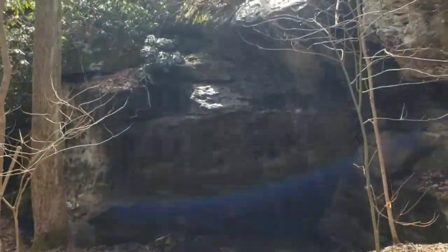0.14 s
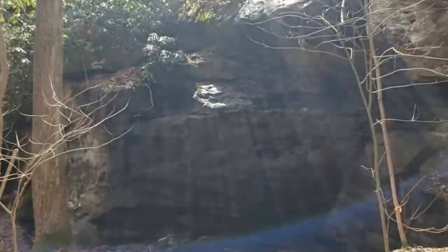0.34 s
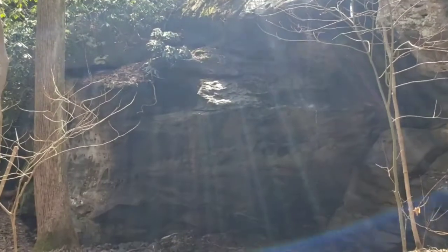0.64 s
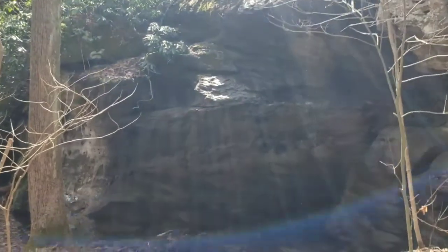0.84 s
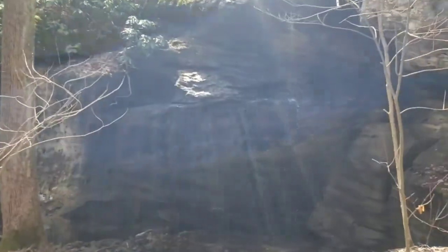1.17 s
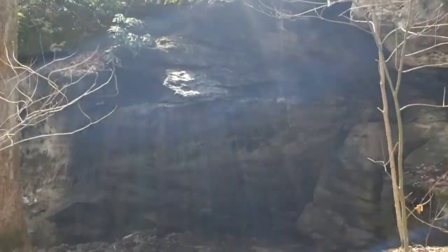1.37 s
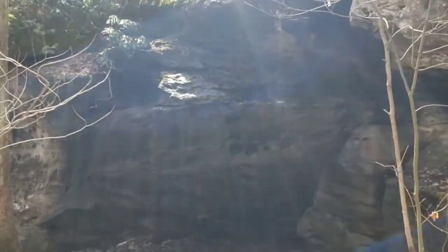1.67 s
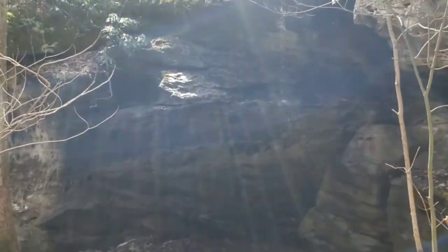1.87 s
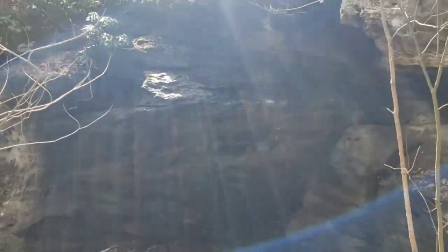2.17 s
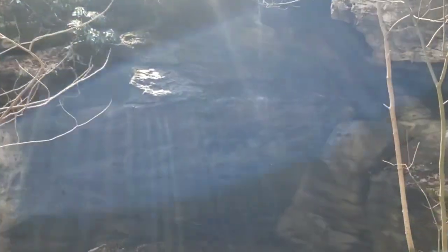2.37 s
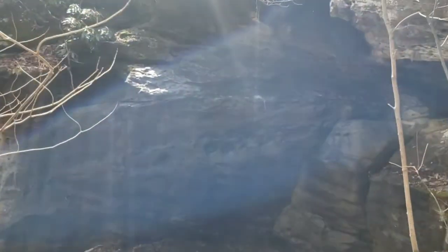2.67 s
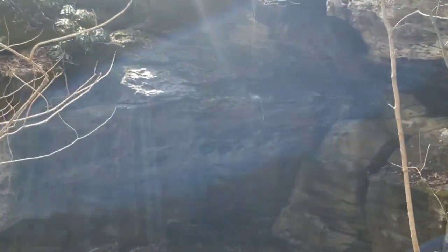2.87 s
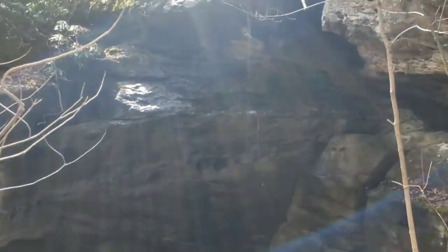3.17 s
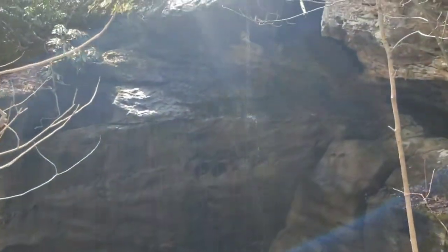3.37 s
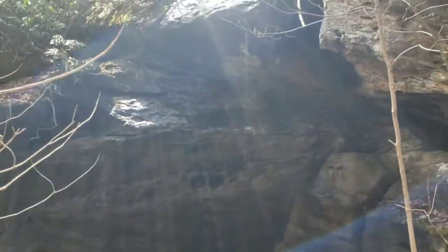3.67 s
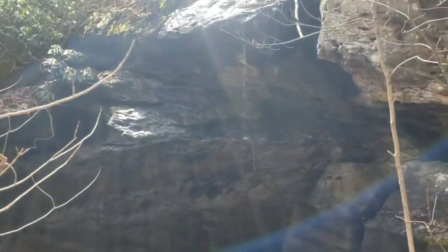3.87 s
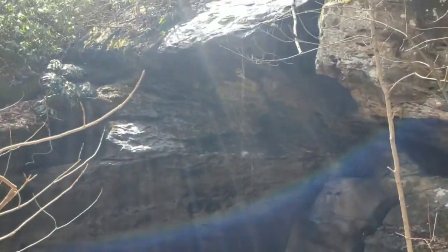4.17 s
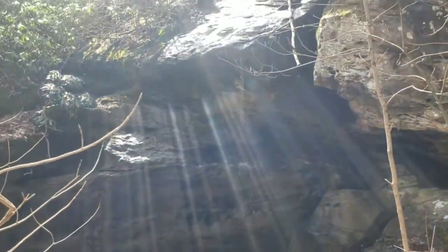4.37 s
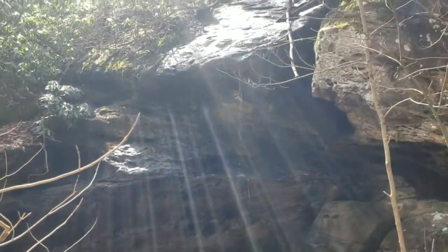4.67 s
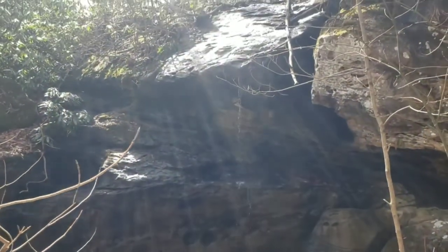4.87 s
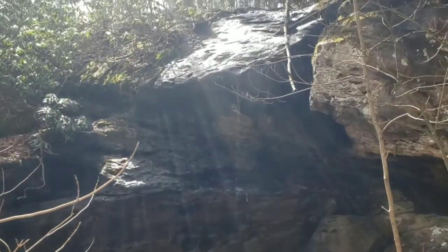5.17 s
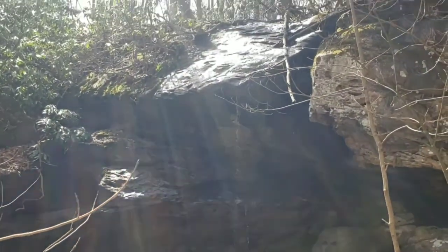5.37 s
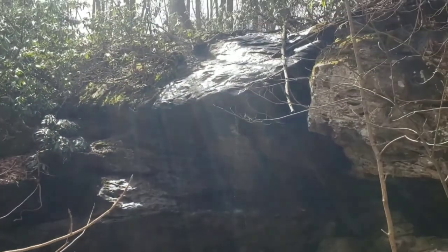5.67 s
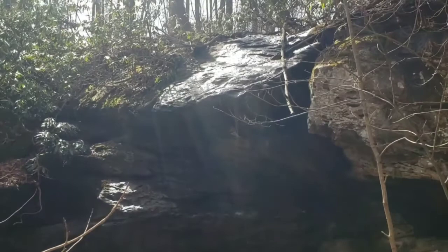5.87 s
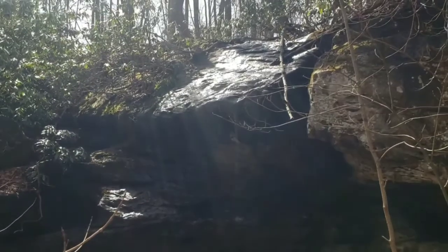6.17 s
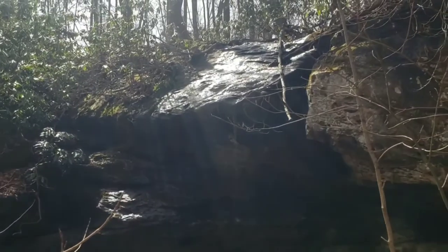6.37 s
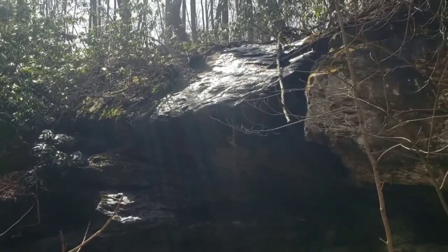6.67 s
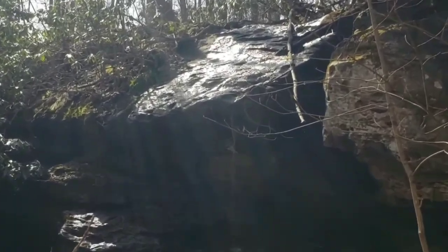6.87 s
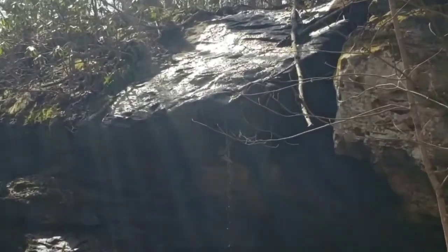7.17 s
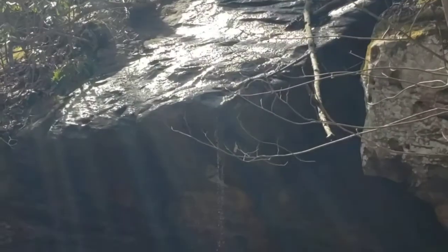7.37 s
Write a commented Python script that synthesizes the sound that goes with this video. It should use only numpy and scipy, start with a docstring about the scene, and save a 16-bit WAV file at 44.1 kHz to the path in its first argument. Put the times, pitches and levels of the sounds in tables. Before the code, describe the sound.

Water trickles and patters off a rock ledge onto stone, with sharp drop smacks and fizzy snaps, while a hand softly bumps the camera.

```python
"""In a quiet wood, water trickles off a rock ledge and spatters on the stone below.
The patter is a crowd of short rings and noise that swells in spurts; bigger drops smack out of it as
bursts of noise through resonances, and close droplets snap as short, high fizzes. The hand that holds the
camera adds rumble and rustle (shaped noise), ticks of the shell (short decaying tones, as are two dull plops)
and one finger rub (jerky noise through shell resonances), mostly nearer the left microphone."""
import sys
import numpy as np
from scipy import signal
from scipy.fft import rfft, irfft, next_fast_len
from scipy.io import wavfile
from scipy.ndimage import uniform_filter1d

SR = 44100
rng = np.random.default_rng(int(sys.argv[2]) if len(sys.argv) > 2 else 0)


def wav_out(sig):
    """Save sig, one row per channel (or a flat mono array), as 16-bit PCM at SR to the path in sys.argv[1]."""
    wavfile.write(sys.argv[1], SR, np.round(np.clip(np.atleast_2d(sig).T, -1, 1) * 32767).astype(np.int16))


N = 332073  # length of the sound in samples
LEAD_S = .00005  # the ledge lies a little to the right: its sound reaches that microphone first


def amp(db):
    """Turns dB into a plain gain."""
    return 10 ** (np.asarray(db) / 20)


def evened(x):
    """Scales a sound to an overall loudness (RMS) of 1."""
    return x / np.sqrt(np.mean(x ** 2) + 1e-20)


def smoothed_twice(x, width, axis=-1):
    """Averages neighbours twice, which leaves only slow, rounded changes."""
    return uniform_filter1d(uniform_filter1d(x, width, axis=axis), width, axis=axis)


def steadied(x, length_s):
    """Holds the loudness of a noise even over the given time."""
    power = uniform_filter1d(x ** 2, max(int(length_s * SR), 2), axis=-1)
    return x / np.sqrt(abs(power) + 1e-20)


def read(points, hz):
    """Reads a table of (Hz, value) between its points, on a logarithmic pitch scale."""
    f, value = np.transpose(points)
    return np.interp(np.log(hz + 1), np.log(f + 1), value)


def curves(rows):
    """Turns every column after the time into a curve with one value a sample."""
    s, *columns = np.transpose(rows)
    return [np.interp(np.arange(N) / SR, s, column) for column in columns]


def bump(middle_s, length_s):
    """A smooth rise and fall from 0 to 1 and back."""
    position = (np.arange(N) / SR - middle_s) / length_s
    return np.cos(np.pi * np.clip(position, -.5, .5)) ** 2


def sides(pan_db):
    """Left and right gains whose mean is 1; plus dB makes the left louder."""
    left = amp(pan_db)
    return 2 * np.array([left, np.ones_like(left)]) / (1 + left)


def add(mix, s, sound):
    """Mixes in a sound at the given second, cut off at the end of the mix."""
    part = mix[:, round(s * SR):][:, :sound.shape[1]]
    part += sound[:, :part.shape[1]]


def ring(x, hz, width_hz):
    """One resonance with gain 1 at its peak, which lies no higher than 14700 Hz."""
    return signal.lfilter(*signal.iirpeak(min(hz, SR / 3), hz / width_hz, SR), x)


def spurts(depth_db, length_s):
    """The sound comes in clumps: a gain that wanders up and down at random."""
    width = max(int(length_s * SR), 2)
    return amp(depth_db * evened(smoothed_twice(rng.standard_normal(N), width)))


def spatter(low_hz, high_hz, per_s, spread_db, cycles, wash_db):
    """Droplets as short rings of many pitches, a few much larger than most, over the blur of the far ones."""
    size = amp(spread_db * np.minimum(rng.exponential(1, (2, N)), 4.2))
    lands = rng.random((2, N)) < per_s / SR
    clicks = size * rng.standard_normal((2, N)) * lands
    pitches = np.geomspace(low_hz, high_hz, num=8)
    which = rng.integers(0, len(pitches), (2, N))
    rings = sum(ring(clicks * (which == k), hz, hz / cycles) for k, hz in enumerate(pitches))
    blur = ring(rng.standard_normal((2, N)), np.sqrt(low_hz * high_hz), high_hz)
    return evened(rings) + amp(wash_db) * evened(blur)


# How the water leans at each pitch. Each row: pitch in Hz, left over right in dB.
WATER_LEAN = [(60, 6), (110, 9.5), (200, 17), (380, 30), (700, 8), (1290, 3.5), (2380, -2), (4400, 0.5),
              (8120, 2), (15000, -2.5)]
# How alike the water is at the two microphones. Each row: pitch in Hz, likeness from 0 (none) to 1 (same).
WATER_LIKENESS = [(150, .55), (600, 0.43), (1400, 0.54), (2200, 0.25), (3500, 0.59), (6000, 0.24),
                  (10000, 0), (15000, 0.035)]


def coloured(x, spectrum, patchy_db):
    """Colours a pair of signals in short frames, with drifting patches and the likeness of the two microphones."""
    hz, _, frames = signal.stft(x, SR, nperseg=512, noverlap=384)
    patches = rng.standard_normal(frames.shape[1:])
    for size, axis in ((8, 0), (10, 1)):  # smooth over pitch, then over time
        patches = uniform_filter1d(patches, size=size, axis=axis)
    patches = evened(patches)
    same = np.clip(read(WATER_LIKENESS, hz), -1, 1)[:, None]
    earlier = np.exp(2j * np.pi * hz[:, None] * LEAD_S)
    left = frames[0]
    right = same * left * earlier + np.sqrt(1 - same ** 2) * frames[1]
    gain = amp(read(spectrum, hz)[:, None] + patchy_db * patches)
    frames = np.array([left, right]) * gain * sides(read(WATER_LEAN, hz))[:, :, None]
    return evened(signal.istft(frames, SR, nperseg=512, noverlap=384)[1][:, :N])


# Flow of the trickle, before gushes and clumps.
# Each row: time in seconds, level of the patter in dB, level of the fine spray in dB.
FLOW = [(0.0, -44.5, -43), (0.33, -45, -42), (0.67, -45, -39.5), (1.51, -42, -40), (2.01, -44, -39),
        (2.27, -42, -38.5), (2.52, -44.5, -39), (3.02, -45, -41.5), (3.14, -42, -39), (3.92, -46, -39),
        (4.61, -47, -41), (5.01, -43, -37), (5.56, -46.5, -38.5), (5.83, -42.5, -39.5), (7.32, -42, -38.5),
        (7.53, -43, -39)]
# Colour of the patter. Each row: pitch in Hz, gain in dB compared with the other rows.
PATTER_COLOUR = [(88, -54), (150, -49.5), (303, -26), (391, -19), (515, -10), (561, -29), (725, -10.5),
                 (1210, -8), (2030, -0.5), (2710, -2), (3690, 1), (5970, -7.5), (9000, -25), (11700, -23),
                 (19800, -120)]
# Colour of the fine spray. Each row: pitch in Hz, gain in dB compared with the other rows.
SPRAY_COLOUR = [(4120, -11), (7000, -4), (8530, -6.5), (11400, 1), (15200, 3), (16300, -3.5), (16500, -47)]
# The camera turns. Each row: time in seconds, left over right of the water in dB.
HEADING = [(0, -2), (1.3, -1), (1.6, 1), (2.3, 1), (3.1, 0.5), (4, -0.2), (5.6, 0.5), (6.2, -2), (6.7, -2),
           (7.53, -2.5)]
# Gushes over the ledge.
# Each row: middle in seconds, length in seconds, swell in dB, left over right in dB added to the heading.
GUSHES = [(0.57, 0.18, 3, -1), (0.767, 0.21, 7.5, 2), (1.164, 0.079, 5, -1.5), (1.527, 0.2, 6.5, 2),
          (1.767, 0.083, 2, -7), (2.163, 0.22, 9, 5.5), (2.394, 0.18, 3, 2), (2.748, .14, 6.5, 0),
          (3.016, 0.2, 7, 2.5), (3.249, 0.086, 4, -1), (3.526, 0.16, 2, 2), (4.558, 0.25, 4.5, 0.5),
          (4.798, 0.21, 2.5, -1.5), (5.326, 0.063, 3, -2), (5.534, 0.13, 3.5, 0), (5.81, 0.27, 5.5, 0.5),
          (6.62, 0.07, 2, -2), (6.703, 0.04, 3, -5), (6.834, 0.18, 4, -2), (7.314, 0.14, 2, 2)]


def trickle():
    """Coarse patter and fine spray, clumped by shared spurts and by their own; gushes swell both."""
    patter_db, spray_db = curves(FLOW)
    pan_db, = curves(HEADING)
    swell_db = np.zeros(N)
    for s, length, gush_db, gush_pan_db in GUSHES:
        shape = bump(s, length)
        swell_db += gush_db * shape
        pan_db = pan_db + gush_pan_db * shape
    clumps = evened(spurts(depth_db=0.18, length_s=0.028) * spurts(depth_db=0.94, length_s=0.014))

    coarse = spatter(low_hz=700, high_hz=7550, per_s=1800, spread_db=2.5, cycles=3.06, wash_db=2)
    patter = coloured(coarse, PATTER_COLOUR, patchy_db=2.5) * spurts(depth_db=1.1, length_s=0.032)
    patter = patter * amp(patter_db + swell_db)

    fine = spatter(low_hz=5800, high_hz=14300, per_s=5000, spread_db=2.0, cycles=5.5, wash_db=-1.5)
    spray = coloured(fine, SPRAY_COLOUR, patchy_db=1.66) * spurts(depth_db=0.85, length_s=0.0082)
    spray = spray * amp(spray_db + 0.77 * swell_db)  # the spray swells by a smaller share
    return clumps * sides(pan_db) * (patter + spray)


def shaken(spectrum, same, length_s):
    """A pair of noises of one colour, partly alike, their loudness held even."""
    size = next_fast_len(N)
    gain = amp(read(spectrum, np.fft.rfftfreq(size, 1 / SR)))
    a, b = irfft(rfft(rng.standard_normal((2, size))) * gain, size)[:, :N]
    return steadied(np.array([a, same * a + np.sqrt(1 - same ** 2) * b]), length_s)


# Steady grip on the camera, before lumps and placing left or right.
# Each row: time in seconds, rumble in dB, rustle of skin in dB, deep sway in dB.
GRIP = [(0, -54.5, -54, -82), (.6, -55.5, -58, -70), (1.2, -58, -62.5, -68), (2, -59, -64.5, -80),
        (2.6, -67, -67.5, -54), (3.2, -61.5, -60, -61), (3.8, -66, -64.5, -67), (4.4, -67, -70, -72),
        (4.9, -64, -57.5, -60), (5.5, -71.5, -73.5, -72), (6.1, -67, -69, -68), (6.45, -63, -71, -68),
        (7, -64, -69, -75), (7.53, -66.5, -66, -69)]
# Swells of low sound: shifts of the hand, and near 0.75 s the low body of a gush.
# Each row: middle in seconds, length in seconds, rumble in dB, rustle in dB, sway in dB, left over right in dB.
LOW_SWELLS = [(0.07, 0.086, -45.5, -61, -62, 1), (0.726, 0.08, -60, -47.5, -62, 2),
              (0.773, 0.081, -58, -47, -53, -5), (0.96, 0.24, -59, -54.5, -65, -10),
              (1.44, 0.14, -69, -55, -55, 8), (1.61, 0.33, -47, -49.5, -60, 4),
              (1.806, 0.11, -55, -56.5, -55, 36), (2.157, 0.18, -47.5, -49, -50, 24),
              (2.357, 0.42, -44.5, -57, -43, 18), (2.475, 0.18, -60, -60, -45, 28),
              (2.632, 0.36, -59, -74, -48, 27), (2.768, 0.077, -63, -58.5, -40, 28),
              (2.904, 0.16, -53, -76, -54, 24), (3.008, 0.14, -53, -52, -61, -4),
              (3.275, .1, -60, -72, -49, 25), (3.495, 0.24, -53, -58.5, -68, 15),
              (4.49, .1, -73, -85, -72, 9), (4.913, .15, -56, -59, -66, 19),
              (5.092, 0.14, -57, -79, -62, 26), (5.634, 0.15, -67, -54, -66, 16),
              (5.827, 0.18, -51.5, -65, -52, 18), (6.314, 0.15, -52, -48.5, -58, 1),
              (6.704, .09, -58, -80, -75, 1)]
# Colour of the rumble. Each row: pitch in Hz, gain in dB compared with the other rows.
RUMBLE_COLOUR = [(35, -13), (55, -3), (75, 3.5), (105, -9), (160, -13.5), (300, -34)]
# Colour of the rustle. Each row: pitch in Hz, gain in dB compared with the other rows.
RUSTLE_COLOUR = [(90, -16), (170, -4), (450, -2), (900, -2.5), (1300, -4), (2000, -21)]
# Colour of the deep sway. Each row: pitch in Hz, gain in dB compared with the other rows.
SWAY_COLOUR = [(15, -45), (35, 6), (55, 9), (80, -21), (150, -59)]


def grip():
    """Skin and muscle shake the camera body: sway, lumpy bass and dull rustle; each low swell adds its power."""
    steady_sides = sides(10)[:, None]
    power = [(amp(db) * steady_sides) ** 2 for db in curves(GRIP)]
    for s, length, *levels_db, pan_db in LOW_SWELLS:
        shape = (bump(s, length) * sides(pan_db)[:, None]) ** 2
        power = [p + amp(db) ** 2 * shape for p, db in zip(power, levels_db)]
    rumble_level, rustle_level, sway_level = np.sqrt(power)

    rumble = shaken(RUMBLE_COLOUR, same=0.69, length_s=0.25) * spurts(depth_db=-0.5, length_s=0.074)
    sway = shaken(SWAY_COLOUR, same=0.18, length_s=0.051) * spurts(depth_db=1.5, length_s=0.06)
    rustle = shaken(RUSTLE_COLOUR, same=0.76, length_s=0.2) * spurts(depth_db=4.0, length_s=0.02)
    # The rustle keeps one fixed place: its two side levels are averaged first.
    placed_rustle = sides(5.6)[:, None] * rustle_level.mean(axis=0) * rustle
    return rumble_level * rumble + sway_level * sway + placed_rustle


def heading(s):
    """Left and right gains of a drop at a given time: it lands a little to the right of the patter."""
    return sides(np.interp(s, *np.transpose(HEADING)) - 1.3)[:, None]


# Big drops. Each row: time in seconds, peak of the smack in dB before placing left or right,
# pitch of the smack in Hz, spray in dB against the smack before both are scaled,
# time to fade by 60 dB in seconds.
DROPS = [(0.054, -27.5, 2270, -15, 0.018), (.101, -30, 2070, 3.5, 0.048), (0.146, -29, 1760, -13, 0.03),
         (0.358, -33, 855, -5, 0.047), (0.452, -28, 2260, 5.5, 0.098), (.68, -31, 1710, 5, 0.29),
         (0.719, -25, 1870, -9, 0.074), (.767, -24, 2020, 3, 0.095), (0.878, -27.5, 2770, -7, .05),
         (0.957, -32, 2640, 5, .07), (1.025, -32, 2780, 11.5, .065), (1.038, -30, 2810, -3, 0.02),
         (1.095, -29, 940, -13, 0.13), (1.121, -30, 1780, -10, 0.045), (1.284, -30, 2230, -14, 0.039),
         (1.378, -29, 2820, -9, .055), (1.519, -30, 2600, -5, 0.054), (1.545, -31, 2400, -6, .05),
         (1.722, -25, 3370, 3, 0.041), (1.8, -28.5, 3600, 9, 0.17), (1.948, -26, 3800, 6, 0.092),
         (2.051, -23, 3600, -3, 0.055), (2.086, -26.5, 3650, -13, .065), (2.27, -28.5, 1850, 2, 0.057),
         (2.407, -23.5, 3630, -8, 0.071), (2.985, -20, 2200, -11, 0.079), (3.133, -24, 2030, -14, 0.13),
         (3.394, -38, 3450, -8, 0.041), (3.459, -26, 3560, 6, 0.076), (3.552, -27, 1690, 4, 0.044),
         (3.736, -23, 3400, -14, 0.045), (3.838, -28, 4000, 3, 0.076), (3.868, -29, 3600, 2, 0.077),
         (4.053, -30.5, 3470, -8, 0.054), (4.15, -35.5, 2000, -8, .1), (4.201, -27.5, 3610, 3, 0.37),
         (4.28, -26.5, 2330, 3, 0.079), (4.459, -29, 3440, -9, .039), (4.51, -23.5, 3240, -1, .056),
         (4.61, -26, 3580, -1, .065), (4.751, -26, 2440, 7.5, 0.085), (4.794, -32, 2540, 11, .065),
         (4.882, -21, 2390, 1, 0.13), (4.979, -32, 1260, 9, 0.092), (5.093, -25.5, 2040, -7, .087),
         (5.187, -29, 3660, -6, 0.095), (5.323, -28, 3850, 0, 0.084), (5.366, -24, 2280, -17, 0.045),
         (5.505, -29, 2100, -8, 0.095), (5.528, -21, 2160, -9, 0.063), (5.614, -28.5, 3460, 1, 0.15),
         (5.749, -27, 2110, -2, 0.04), (5.917, -26.5, 1940, -11, .07), (6.011, -21, 2760, -11, 0.032),
         (6.175, -23.5, 3400, 3.5, 0.062), (6.435, -22, 3200, 1.5, 0.062), (6.475, -24.5, 2920, 0, 0.034),
         (6.527, -23, 2100, -5, 0.085), (6.576, -23.5, 4120, -19, 0.14), (6.634, -25, 3780, 0, 0.041),
         (6.786, -21.5, 2120, -8, 0.05), (6.894, -26, 2770, 6, .055), (6.932, -24.5, 3800, -11, 0.062),
         (7.025, -28, 3600, -11, 0.06), (7.042, -30, 1410, -8, 0.11), (7.098, -25.5, 3740, -7, 0.11),
         (7.159, -29, 3700, 10.5, 0.16), (7.295, -20, 3770, -1, 0.043), (7.315, -24, 1970, -12, .07),
         (7.343, -21, 3800, -27, 0.048), (7.422, -22, 3350, -2, 0.1), (7.454, -28, 3620, 1, 0.11)]


def drops():
    """Each drop is a dying burst: a narrow pitched ring, coloured by the microphone's resonances, a splat and a hiss."""
    out, t = np.zeros((2, N)), np.arange(2800) / SR
    lead_s, rise_s = .0025, .0038  # the first droplets land before the smack; rise time of the burst
    for s, db, hz, spray_db, t60 in DROPS:
        a, b, c, grit = rng.standard_normal((4, len(t)))
        right = 0.6 * np.roll(a, -round(LEAD_S * SR)) + 0.79 * b
        burst = np.array([a, right]) * amp(7.3 * grit)  # the grit makes a few grains stand out
        fade = (1 - np.exp(-t / rise_s)) ** 2 * amp(-60 * t / t60)

        narrow_ring = ring(ring(burst, hz, width_hz=0.3 * hz), hz, width_hz=.5 * hz)
        narrow_ring = steadied(narrow_ring, length_s=0.054)
        splat = ring(ring(burst, 2800, width_hz=920), 2720, width_hz=8700)
        splat = steadied(splat, length_s=0.014)
        hiss = evened(ring(np.array([c, b]), 10900, width_hz=7800))

        smack = fade * (narrow_ring + amp(0.5) * splat)
        level = amp(db) / abs(smack).max()
        add(out, s - lead_s, level * heading(s) * (smack + amp(spray_db) * fade * hiss))
    return out


# Ticks of the shell and, at .151 and 4.632, dull plops.
# Each row: time in seconds, click in dB, click pitch in Hz, click length in cycles,
# knock in dB, knock pitch in Hz, time for the knock to fade by 60 dB in seconds, thump in dB,
# left over right in dB. The levels are those before the onsets and the placing left or right.
TICKS_AND_PLOPS = [(.151, -50, 1700, 2.2, -41, 427, 0.14, -60, 4),
                   (.217, -47, 1500, 2.2, -35.5, 620, 0.02, -63, 3),
                   (1.5607, -24, 2780, 2.1, -30, 700, 0.006, -38, 15),
                   (1.5648, -24, 2480, 1.2, -11, 714, 0.0034, -56, 29),
                   (1.605, -38, 2500, 2.2, -37.5, 194, 0.074, -33, 11),
                   (1.783, -8.5, 2690, 2, -13, 430, 0.008, -17, 43),
                   (2.131, -17.5, 1900, 4.2, -15.5, 486, .011, -32, 5),
                   (2.2614, -28, 1580, 1.8, -25.5, 990, 0.0071, -49, 6),
                   (2.284, -36, 1900, 3.5, -16.5, 450, 0.0052, -40, 31),
                   (2.299, -36, 2530, 2.2, -47, 500, 0.0074, -45, 17),
                   (2.653, -53, 2000, 2.2, -37, 1100, 0.016, -50, 5),
                   (3.004, -39, 2000, 2.2, -30, 168, 0.03, -32, 7),
                   (3.901, -35, 1880, 2, -31, 613, 0.0032, -65, 9),
                   (4.61, -48, 1500, 2.2, -45, 624, 0.041, -60, 9),
                   (4.632, -40, 1490, 2.4, -41.5, 420, 0.058, -62, 10),
                   (5.241, -39, 1500, 2.5, -38, 302, 0.0089, -44, -3),
                   (5.768, -32, 2600, 2.2, -27, 1240, 0.014, -51, 25),
                   (5.804, -28, 2000, 2.5, -27, 800, .014, -47, 15),
                   (5.818, -31, 2000, 2.8, -39, 900, .008, -28, 9),
                   (5.853, -44, 2000, 2.2, -23.5, 620, 0.018, -44, 27),
                   (5.871, -43, 2000, 2.2, -21, 1150, 0.014, -53, 22),
                   (5.881, -29, 3000, 2.2, -20, 1020, 0.0063, -50, 27),
                   (6.2869, -30, 1440, 3.6, -24.5, 870, .008, -27, 34),
                   (6.3295, -22.5, 4100, 2.5, -11.5, 1060, 0.0048, -52, 21),
                   (6.4073, -54, 2500, 2.2, -25, 1010, 0.0054, -51, 20)]


def ticks_and_plops():
    """Each is a click of a few cycles with a faint ring and crack, a short knock and a slow low push."""
    out, t = np.zeros((2, N)), np.arange(3000) / SR
    push_hz, push_t60_s, push_rise_s = 88, .03, .001
    for s, click_db, click_hz, cycles, knock_db, knock_hz, t60, thump_db, pan_db in TICKS_AND_PLOPS:
        hump = np.sin(np.pi * np.minimum(click_hz * t / cycles, 1)) ** 2
        tail = 0.21 * amp(-60 * t / 0.0069)
        crack = ring(rng.standard_normal(len(t)), click_hz, width_hz=6300)
        crack = 0.5 * amp(-60 * t / 0.02) * crack
        click = amp(click_db) * (crack - (hump + tail) * np.sin(2 * np.pi * click_hz * t))

        knock_onset = 1 - np.exp(-t * knock_hz * 3.9)
        knock = amp(knock_db - 60 * t / t60) * knock_onset * np.sin(2 * np.pi * knock_hz * t)

        push_onset = 1 - np.exp(-t / push_rise_s)
        push = amp(thump_db - 60 * t / push_t60_s) * push_onset * np.sin(2 * np.pi * push_hz * t)
        add(out, s, sides(pan_db)[:, None] * (click + knock + push))
    return out


# Droplets that snap close by. Each row: time in seconds, peak in dB before placing left or right,
# pitch in Hz (those above 14700 sound at 14700), left over right in dB.
SNAPS = [(0.5846, -21, 15400, -6), (0.9763, -24, 12500, -11), (1.187, -18.5, 12200, -4.5),
         (1.6775, -23, 12100, -6), (1.708, -20, 8800, 5), (1.766, -21, 7440, 0.5), (1.797, -22, 7400, -3),
         (1.852, -17, 15100, 0), (2.281, -19, 12200, 6), (3.1757, -23, 12500, -1.5), (3.247, -23, 15400, 6),
         (3.5203, -19, 10500, 1.0), (4.2187, -16, 15200, 1.0), (4.521, -18, 13200, 1),
         (4.795, -19, 13700, 9), (5.7129, -15, 11100, 1.5), (5.803, -17, 11300, 4), (6.037, -21, 11800, -8),
         (6.5054, -20, 11500, -5), (6.6473, -18, 10900, -3), (6.6516, -15, 11700, -4),
         (6.704, -15.5, 15500, -1.5), (6.7474, -20, 15000, -2.0), (6.825, -14, 12800, -3.0),
         (7.27, -21, 11500, -13)]


def snaps():
    """Each snap is a sharp high click of fizzing noise: most dies within milliseconds, a weaker part lingers."""
    out, t = np.zeros((2, N)), np.arange(600) / SR
    for s, db, hz, pan_db in SNAPS:
        fizz = evened(ring(rng.standard_normal((2, len(t))), hz, width_hz=0.22 * hz))
        snap = fizz * (amp(-60 * t / 0.004) + 0.28 * amp(-60 * t / 0.13))
        add(out, s, amp(db) / abs(snap).max() * sides(pan_db)[:, None] * snap)
    return out


# Finger rub. Each row: time in seconds, level in dB before placing left or right.
RUB = [(5.78, -51), (5.795, -37.5), (5.815, -40.5), (5.84, -40.5), (5.853, -35), (5.878, -34.5),
       (5.888, -45), (5.9, -60)]
# Resonances of the shell under the finger.
# Each row: pitch in Hz, width of the first filter in Hz (the second is twice as wide), gain in dB.
SHELL = [(450, 670, 9), (746, 880, 9), (1150, 410, 6), (2000, 840, -17)]


def rub():
    """A finger slips in jerks over the shell beside the left microphone, and the shell resonates."""
    out = np.zeros((2, N))
    s, db = np.transpose(RUB)
    t = np.arange(s[0], s[-1], 1 / SR)
    jerks = rng.random(len(t)) < 1500 / SR  # about 1500 a second
    slips = rng.standard_normal(len(t)) * (0.36 + 2.3 * jerks)
    body = sum(amp(gain_db) * ring(ring(slips, hz, width), hz, 2 * width) for hz, width, gain_db in SHELL)
    level = amp(np.interp(t, s, db)) * signal.windows.tukey(len(t), .1)  # soft ends
    add(out, s[0], sides(29.0)[:, None] * level * evened(body))
    return out


def scene():
    """The water and the hand on the camera together."""
    return trickle() + grip() + drops() + ticks_and_plops() + snaps() + rub()


def record(dry):
    """The microphone loses the deepest bass; then the band limit of the recorder cuts the top treble."""
    bass_cut = signal.butter(2, 40, "high", fs=SR, output="sos")
    treble_cut = signal.firwin(511, 15900, window=("kaiser", 9), fs=SR)
    return signal.oaconvolve(signal.sosfilt(bass_cut, dry), treble_cut[None], "same")


dry = scene()
out = record(dry)
wav_out(out)
```